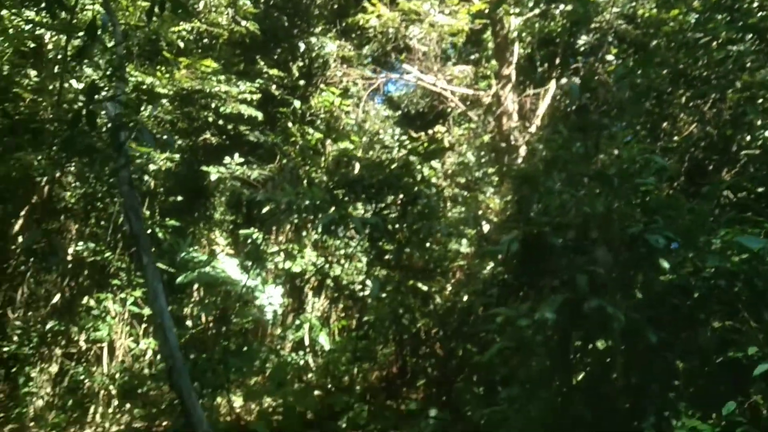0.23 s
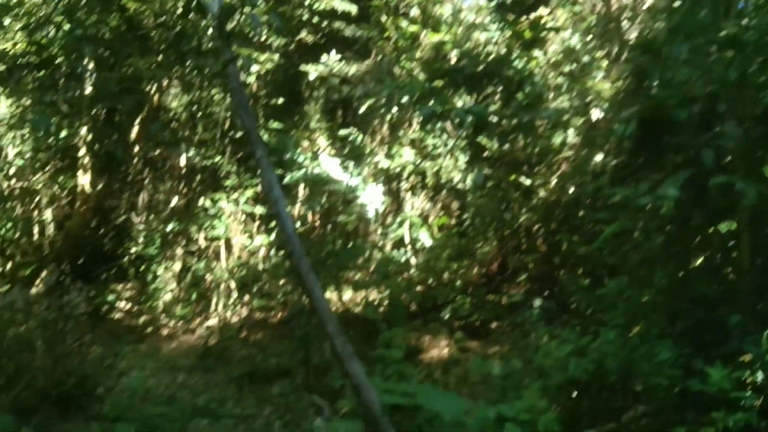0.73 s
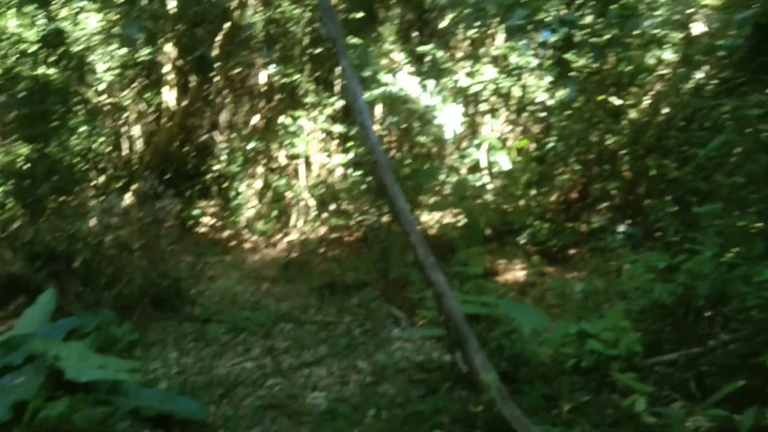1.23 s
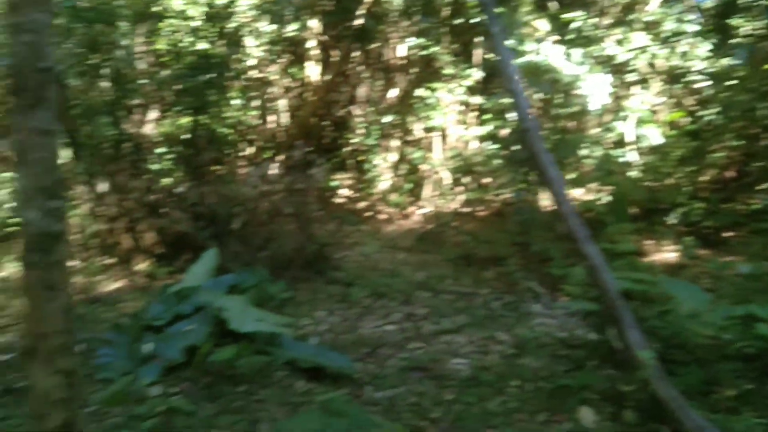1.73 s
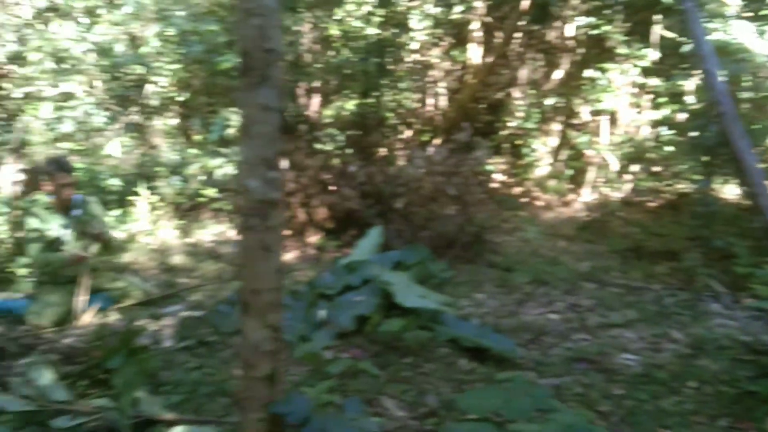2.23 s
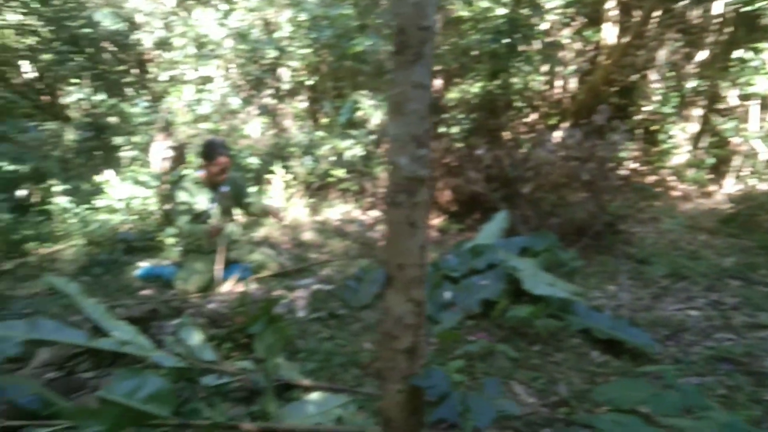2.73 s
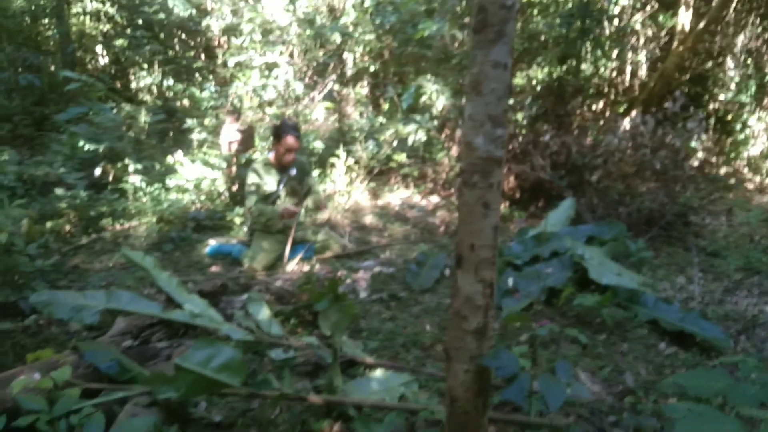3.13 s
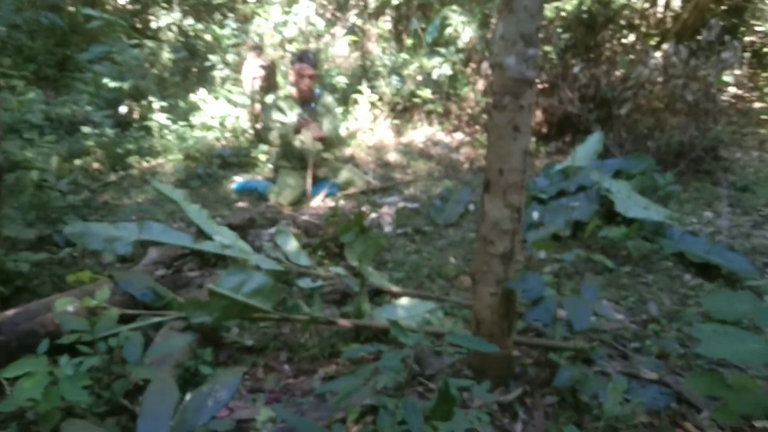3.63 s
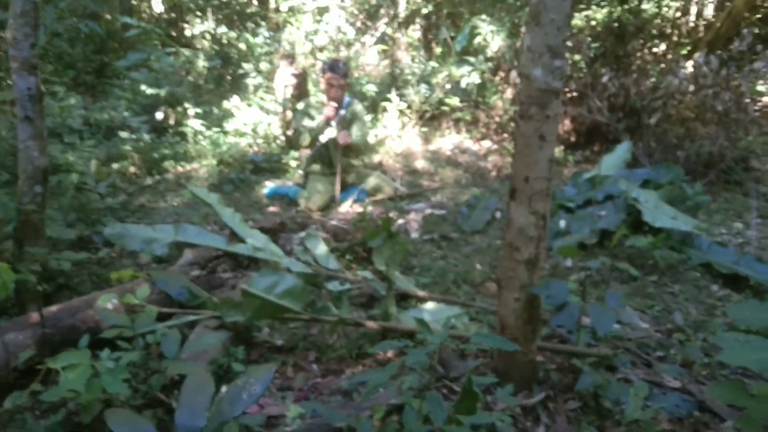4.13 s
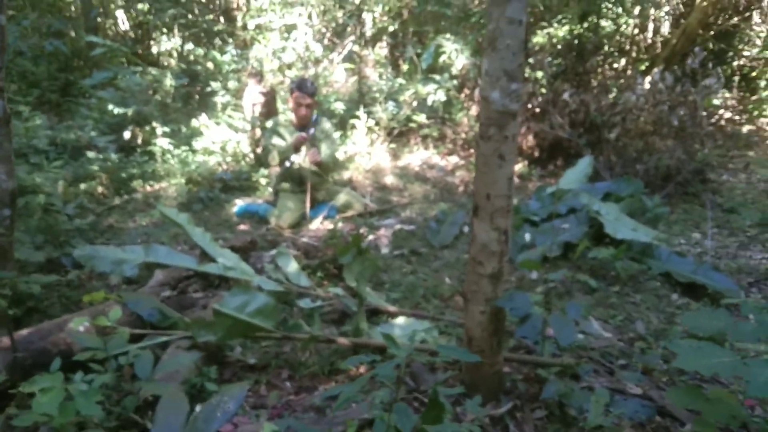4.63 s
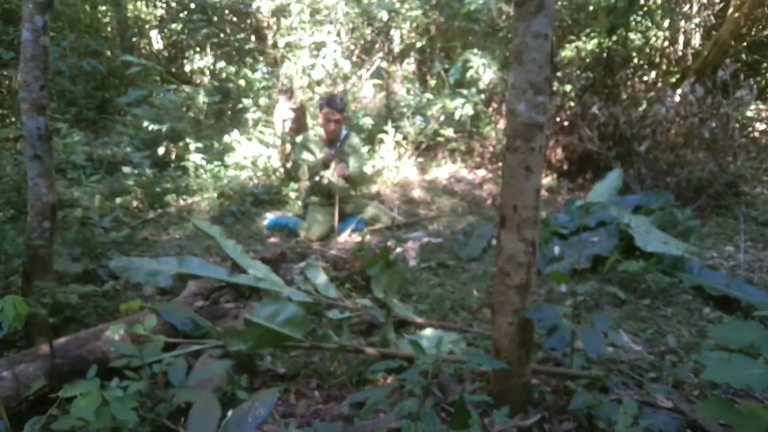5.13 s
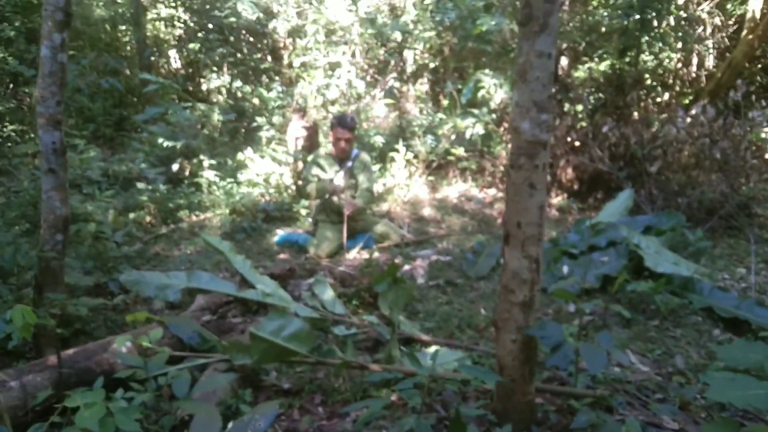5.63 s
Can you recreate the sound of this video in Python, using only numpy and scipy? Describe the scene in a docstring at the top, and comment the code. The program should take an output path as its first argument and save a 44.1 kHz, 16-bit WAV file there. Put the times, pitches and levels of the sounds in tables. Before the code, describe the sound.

Someone treads carefully over dead leaves and sticks, twigs cracking close by and echoing lightly among trees, with thin distant insect song.

```python
"""Forest floor: slow steps through dry leaf litter, with soft thuds, stick knocks, shuffling and scuffs. Twigs
snap as noise bursts through wood resonances; a leafy branch swept aside crackles as ringing grains. Clicks
close to the microphone are damped modes; twigs, branch, knocks and clicks echo among the trunks. Thin insect
song, faint whistles and one lingering twig ring are blurred tones in the distance, over steady air noise."""
import sys
import numpy as np
from scipy import signal
from scipy.fft import rfft, irfft, next_fast_len
from scipy.io import wavfile

SR = 44100
rng = np.random.default_rng(int(sys.argv[2]) if len(sys.argv) > 2 else 0)


def unload_audio(sound):
    """Save the sound as a 16-bit wav file, at the path given as the first command line argument."""
    columns = np.transpose(np.atleast_2d(sound))
    # keep every value between -1 and 1, then stretch to whole-number steps
    steps = np.round(np.clip(columns, -1, 1) * 32767)
    wavfile.write(sys.argv[1], SR, steps.astype(np.int16))


N = 259925
TIME = np.arange(N) / SR


def from_db(db):
    """Amplitude ratio of a level in dB."""
    return 10 ** (np.asarray(db) / 20)


def rms_one(x):
    """Scale to rms 1."""
    return x / np.sqrt(np.mean(x ** 2) + 1e-20)


def in_time(rows):
    """Each column of a curve, interpolated sample by sample."""
    s, *columns = np.transpose(rows)
    return [np.interp(TIME, s, c) for c in columns]


def add(track, s, sound):
    """Mix a sound in at a time in s."""
    at = int(s * SR)
    track[at:at + len(sound)] += sound[:max(N - at, 0)]


def lowpass(x, order, cutoff_hz):
    """Butterworth low-pass."""
    return signal.sosfilt(signal.butter(order, cutoff_hz, fs=SR, output="sos"), x)


def coloured(x, spectrum):
    """Causal minimum-phase filter that follows a spectrum (f/Hz, gain/dB), by folding its cepstrum."""
    size = 2 * next_fast_len(len(x) // 2 + 2048)
    hz, db = np.transpose(spectrum)
    bins_hz = np.arange(size // 2 + 1) * SR / size
    gain = from_db(np.interp(np.log(bins_hz + 1), np.log(hz), db))
    cepstrum = irfft(np.log(gain))[:size // 2]
    cepstrum[1:] *= 2
    return irfft(rfft(x, size) * np.exp(rfft(cepstrum, size)))[:len(x)]


def resonance(x, hz, width_hz):
    """Two-pole band-pass with gain 1 at its peak."""
    r = np.exp(-np.pi * width_hz / SR)
    zeros = np.array([1, 0, -1]) * (1 - r * r) / 2
    poles = [1, -2 * r * np.cos(2 * np.pi * hz / SR), r * r]
    return signal.lfilter(zeros, poles, x + 1e-18)


def dying(t, t60):
    """Exponential decay by 60 dB in t60 s."""
    return np.exp(-np.log(1000) * t / t60)


def bump(middle_s, length_s):
    """Gaussian swell; length_s is the full width at 1/e."""
    return np.exp(-(2 * (TIME - middle_s) / length_s) ** 2)


def drift(rate_hz):
    """Random curve: unit-normal knots at rate_hz, joined by straight lines."""
    knots = rng.standard_normal(4096)
    return np.interp(TIME * rate_hz, np.arange(len(knots)), knots)


def grains(per_s, spread_db):
    """Tiny fractures: impulses of uneven size and random sign at random moments."""
    size_db = spread_db * np.minimum(rng.exponential(1, N), 4)
    sizes = from_db(size_db) * rng.choice([-1, 1], N)
    return sizes * (rng.random(N) < per_s / SR)


def blows(rows, modes, ring_cycles, contact_cycles):
    """A cushioned blow (t/s, level/dB, f/Hz) swells over part of a cycle and rings a few damped modes."""
    out, t = np.zeros(N), TIME[:8192]
    for s, db, hz in rows:
        ring = sum(from_db(mode_db) * np.sin(2 * np.pi * hz * ratio * t) for ratio, mode_db in modes)
        swell = 1 - np.exp(-hz * t / contact_cycles)
        add(out, s, from_db(db) * ring * dying(t, ring_cycles / hz) * swell)
    return out


def softened(x, top_hz):
    """Dead leaves between sole and stick take the sharp edge off a blow."""
    return lowpass(x + 1e-18, 4, top_hz)


def footfalls():
    """A foot thuds on the ground and at once knocks the sticks lying on it."""
    # t/s, thud level/dB before gain, thud f/Hz, knock level/dB before gain and softening, knock f/Hz
    steps = [(.175, -60, 139, -38.5, 900), (.199, -63, 140, -43.5, 640), (.254, -45, 129, -42.5, 533),
             (0.2922, -37.5, 137, -38.5, 520), (.367, -45.5, 107, -55, 450), (.956, -48, 148, -43, 566),
             (1.4618, -46, 94, -22.5, 539), (1.504, -56, 100, -36, 625), (1.792, -50, 99.6, -64, 450),
             (2.178, -48, 115, -59, 394), (2.315, -45, 107, -67, 353), (2.463, -43.5, 109, -52.5, 448),
             (2.661, -52.5, 120, -51, 453), (2.8165, -45.5, 134, -43.5, 520), (3.116, -45.5, 102, -60, 450),
             (3.2279, -42, 136, -37.5, 575), (3.473, -40.5, 142, -40.5, 464), (3.661, -35, 76.4, -59, 505),
             (4.1603, -26.5, 77, -45, 562), (4.3141, -59, 148.4, -26.5, 640), (4.638, -54, 151, -29.5, 380),
             (4.647, -32, 161, -30, 352), (5.0119, -51, 185, -30.5, 790), (5.6494, -60, 110, -16.5, 766),
             (5.672, -40, 97.5, -51, 655)]
    # modes of the ground: f ratio to main pitch, level/dB
    ground_modes = [(1.0, 1.5), (1.7, -10), (2.6, -15.5)]
    # modes of a stick: f ratio to main pitch, level/dB
    stick_modes = [(0.421, -14), (1.0, 0), (1.3, -9.5)]
    thud_gain_db, knock_gain_db = 3.0, 2.5
    thud_cycles, knock_cycles = 4.05, 6.07   # main-pitch cycles to -60 dB
    s, thud_db, thud_hz, knock_db, knock_hz = np.transpose(steps)
    thuds = blows(zip(s, thud_db, thud_hz), ground_modes, thud_cycles, contact_cycles=0.13)
    knocks = blows(zip(s, knock_db, knock_hz), stick_modes, knock_cycles, contact_cycles=0.37)
    return from_db(thud_gain_db) * thuds, from_db(knock_gain_db) * softened(knocks, top_hz=1170)


def leaves(per_s, spread_db, clump_db, ring_share=1.86, width_hz=450, count=10):
    """Dry leaves crackle in clumps; each fracture rings one of count leaf pitches; rms 1."""
    # leaf crackle spectrum: f/Hz, gain/dB
    leaf_colour = [(300, -24), (1000, -12.5), (2100, -4), (2650, -1), (3550, -3), (4400, -4.5),
                   (5400, -6.5), (6100, -6), (6800, -10.5), (8500, -25), (12500, -38), (15300, -34)]
    crackle = grains(per_s, spread_db) * from_db(clump_db * drift(160))
    leaf = rng.integers(0, count, N)
    pitches_hz = np.linspace(1800, 7000, count)
    rings = sum(resonance(crackle * (leaf == k), hz, width_hz) for k, hz in enumerate(pitches_hz))
    return rms_one(coloured(crackle + ring_share * rings, leaf_colour))


def rustle(spectrum, lumpy_db, lumps_per_s):
    """Friction as noise of uneven level; rms 1."""
    noise = rng.standard_normal(N) * from_db(lumpy_db * drift(lumps_per_s))
    return rms_one(coloured(noise, spectrum))


def scuffing():
    """Strength of a sole's short slides over the leaves: quick rise, exponential fall."""
    # slides: t/s, level/dB before the rise, fall to 1/e/s
    scuffs = [(.176, -63, 0.043), (2.178, -59.5, 0.019), (2.814, -65, .025), (3.005, -64.5, 0.13),
              (3.69, -52.5, 0.027), (4.123, -58, 0.081), (4.983, -57, 0.12), (5.557, -59.5, 0.025),
              (5.826, -54, 0.014), (5.865, -51, 0.012)]
    rise_share = 0.1   # rise time / fall time
    out, t = np.zeros(N), TIME[:SR // 2]
    for s, db, fall_s in scuffs:
        rise = 1 - np.exp(-t / (rise_share * fall_s))
        add(out, s, from_db(db) * rise * np.exp(-t / fall_s))
    return out


def shuffling():
    """The walker's effort drives low rumble, soft rubbing and litter crackle together."""
    # how briskly the walker moves: t/s, level above an easy pace/dB
    effort = [(0, -4.5), (.14, -8), (.3, 3.5), (.58, -4.5), (.72, 0), (1.0, -1.5), (1.36, -10), (1.53, 8),
              (1.85, -6.5), (2.35, -1), (2.95, -4.5), (3.15, 0), (4.05, -5), (4.28, 2.5), (4.64, -1),
              (4.85, -6.5), (5.5, 0.5), (5.8, 7)]
    # rumble swells as the weight shifts: middle t/s, 1/e full width/s, peak level/dB
    weight_shifts = [(0.252, 0.2, -61), (0.736, .1, -65), (3.1, 0.18, -65), (4.28, .08, -58.5),
                     (4.57, 0.25, -61.5)]
    # friction spectrum: f/Hz, gain/dB
    rubbing_colour = [(100, -10.5), (250, -4.5), (600, -0.5), (1100, -3), (2500, -6), (6000, -42),
                      (12000, -37.5)]
    # low rumble spectrum: f/Hz, gain/dB
    rumble_colour = [(20, -39.5), (40, -13), (65, -2.5), (90, 1.5), (150, -6.5), (260, -9.5), (600, -25),
                     (2000, -46)]
    # level at an easy pace in dB, dB gained per dB of effort
    rumble_db, rumble_follows = -67.5, 0.67
    rubbing_db, rubbing_follows = -70.5, 0.95
    crackle_db, crackle_follows = -67.5, 1.5
    scuff_rubbing_db = -6   # rubbing in a scuff, re its crackle
    effort_db, scuffs = in_time(effort)[0], scuffing()
    shifts = sum(from_db(db) * bump(s, length_s) for s, length_s, db in weight_shifts)
    crackle = from_db(crackle_db + crackle_follows * effort_db) + scuffs
    rubbing = from_db(rubbing_db + rubbing_follows * effort_db) + from_db(scuff_rubbing_db) * scuffs
    rumble = from_db(rumble_db + rumble_follows * effort_db) + shifts
    return (crackle * leaves(per_s=3400, spread_db=2.0, clump_db=2.5, ring_share=1.0)
            + rubbing * rustle(rubbing_colour, lumpy_db=4.0, lumps_per_s=83)
            + rumble * rustle(rumble_colour, lumpy_db=2.0, lumps_per_s=40))


def fracture(x, low_hz, high_hz, ring_db, top_hz, ring_width_hz=480):
    """Colour of one twig: a broad crack, two wood rings and a soft top."""
    # twig spectrum: f/Hz, gain/dB
    twig_colour = [(150, -12), (600, -6.5), (1200, -8.5), (2200, -1.5), (3400, -2.5), (5500, -3),
                   (7000, -9.5), (9000, -19.5), (12500, -35), (15300, -26)]
    rings = resonance(x, low_hz, ring_width_hz) + resonance(x, high_hz, ring_width_hz)
    cracked = lowpass(x + from_db(ring_db) * rings, 2, min(top_hz, .45 * SR))
    return coloured(cracked, twig_colour)


def twigs(spread_db=2.0, first_break=1.1):
    """A twig fails in one break and a quick run of smaller ones; returns direct sound and echo send."""
    # breaks: t/s, rms level over first 5 ms/dB, splintering fall to 1/e/s, lower ring f/Hz,
    # upper ring f/Hz, echo send re direct/dB
    snaps = [(.303, -31.5, .0045, 3000, 3750, -12), (.320, -38, 0.0012, 4950, 5500, -13),
             (.6003, -28.5, .0022, 3720, 4650, -9), (.6675, -27.5, 0.0023, 3460, 4240, -10),
             (.9955, -47.5, 0.0032, 3700, 4700, -9), (1.391, -43, .003, 3670, 5470, 1),
             (1.422, -36, 0.0022, 3420, 3560, 1.5), (1.4328, -25.5, 0.0038, 3780, 5200, -12),
             (1.4495, -30.5, 0.0017, 3700, 5240, -21), (1.458, -32, 0.0037, 3830, 4350, -25),
             (1.4938, -34.5, .002, 2020, 3280, -11), (3.2265, -32, 0.00034, 3050, 6300, -24.5),
             (3.656, -41.5, 0.0051, 1600, 3830, -10), (4.160, -33.5, 0.0046, 4800, 6170, -20),
             (4.3145, -47.5, 0.0067, 3960, 6900, -13), (4.6376, -25, .0008, 1300, 4200, -33),
             (4.6474, -27.5, 0.0013, 1850, 3400, -43), (5.0115, -46, 0.0036, 3300, 4750, -7),
             (5.647, -39.5, .004, 2300, 3680, -16), (5.6555, -35.5, 0.0023, 2330, 3660, -14),
             (5.660, -34.5, 0.0029, 3580, 3820, 0), (5.671, -41.5, 0.0075, 2200, 3600, -3)]
    # a clean break rings, a long splintering one does not
    ring_ref_db, ring_ref_splinter_s, ring_loss_db_per_doubling = 10.5, 0.0033, 5.5
    top_per_ring = 3.5   # crack top / upper ring f
    rise_share = 0.38    # rise time / splintering time
    direct, sent, t = np.zeros(N), np.zeros(N), TIME[:4096]
    fibres, impulse = grains(24000, spread_db), 1. * (t == 0)
    for k, (s, db, splinter_s, low_hz, high_hz, echo_db) in enumerate(snaps):
        doublings = np.log2(splinter_s / ring_ref_splinter_s)
        ring_db = ring_ref_db - ring_loss_db_per_doubling * doublings
        top_hz = top_per_ring * high_hz
        envelope = np.exp(-t / splinter_s) * (1 - np.exp(-t / (rise_share * splinter_s)))
        burst = fibres[k * len(t):(k + 1) * len(t)] * envelope
        crack = fracture(burst + first_break * impulse, low_hz, high_hz, ring_db, top_hz)
        crack *= from_db(db) / np.sqrt(np.mean(crack[t < .005] ** 2) + 1e-20)
        add(direct, s, crack)
        # scattering smears the single breaks: only the twig's colour and energy reach the echo
        colour = rms_one(fracture(impulse, low_hz, high_hz, ring_db, top_hz))
        add(sent, s, colour * crack.std() * from_db(echo_db))
    return direct, sent


def branch():
    """Leaves of a bending branch crackle ever louder, then settle quickly once it is let go."""
    # its leaves are brighter than the litter: f/Hz, gain/dB
    tint = [(1000, -1.5), (2000, -4.5), (2700, -6), (3600, 2), (6000, 1), (10000, 2)]
    start_s, release_s = 1.359, 1.455
    peak_db, grows_db_per_s, dies_db_per_s = -36, 75, 380
    late_s = TIME - release_s
    level_db = peak_db + np.minimum(grows_db_per_s * late_s, -dies_db_per_s * late_s)
    crackle = leaves(per_s=1800, spread_db=2.0, clump_db=0.0, ring_share=2.5)
    return (TIME > start_s) * from_db(level_db) * rms_one(coloured(crackle, tint))


def clicks():
    """One hard contact close by rings a few heavily damped modes of alternating sign."""
    # contacts: t/s, level/dB added to each mode's, pitch ratio to the modes
    contacts = [(.6005, -24, 1.08), (1.433, -21, 1.5), (1.4628, -13.5, 1.19), (1.506, -23.5, 0.7),
                (3.215, -27.5, 0.99), (3.474, -36.5, 0.72), (3.715, -43, 1.3), (4.128, -35.5, 0.64),
                (4.266, -38, 1.25), (4.6374, -2, 1.0), (4.6466, -11.5, 1.0), (4.679, -34, 0.77)]
    # modes: f/Hz at ratio 1, level/dB, t60/s
    modes = [(784, -23.5, 0.012), (1600, -9, 0.0031), (1940, -12.5, 0.0014), (2950, -3.5, 0.004),
             (4070, -6.5, 0.00076), (6130, -14, 0.0066)]
    out, t = np.zeros(N), TIME[:2048]
    for s, db, pitch in contacts:
        for k, (hz, mode_db, t60) in enumerate(modes):
            ring = np.sin(2 * np.pi * hz * pitch * t) * dying(t, t60)
            add(out, s, (-1) ** k * from_db(db + mode_db) * ring)
    return out


def forest(x, near_t60=0.26, far_t60=0.76, far_db=-15, build_s=0.002):
    """Near trunks scatter a quick tail, far ones a faint long one; the echo is thin and bright."""
    t = TIME[:SR]
    fade = (dying(t, near_t60) + from_db(far_db) * dying(t, far_t60)) * (1 - np.exp(-t / build_s))
    tail = rng.standard_normal(SR) * fade
    echo = signal.fftconvolve(x, tail / np.sqrt(np.sum(tail ** 2)))[:N]
    # f/Hz, gain/dB
    return coloured(echo, [(200, -20), (1200, 6.0), (3200, 1.5), (7000, 7.0), (15000, 10.0)])


def narrow_band(hz, width_hz):
    """A tone blurred by many voices and echoes, as modulated slow noise; pitch may glide; rms 1."""
    blur = lowpass(rng.standard_normal((2, N)), 2, width_hz / 2)
    phase = 2 * np.pi * np.cumsum(hz) / SR
    return rms_one(blur[0] * np.cos(phase) + blur[1] * np.sin(phase))


def insects(width_hz=420, skirt_hz=900, skirt_db=-6):
    """Many far insects merge into one narrow, slowly gliding band with soft skirts."""
    # chorus: t/s, level/dB, f/Hz
    chorus = [(0, -71, 6260), (.25, -84, 6410), (1.9, -77, 6130), (2.3, -69.5, 6120), (3.1, -71.5, 6340),
              (4.0, -76, 6130), (5.3, -70, 6110), (5.89, -87, 6250)]
    level_db, hz = in_time(chorus)
    band = narrow_band(hz, width_hz) + from_db(skirt_db) * narrow_band(hz, skirt_hz)
    return rms_one(band) * from_db(level_db)


def far_tones(width_hz=240, waver_db=2.0):
    """Far calls, and one twig ring lingering among the trees, swell and fade, wavering in level, blurred by the
    forest."""
    # tones (far calls and, at 1.03 s, a lingering twig ring): middle t/s, peak level/dB before waver, f/Hz
    tones = [(.07, -76, 4230), (.43, -70, 4300), (1.03, -67, 3750), (2.1, -73.5, 4300), (3.02, -74, 4200),
             (3.35, -74.5, 4250), (3.53, -74, 4370), (3.8, -73.5, 4330), (5.33, -74.5, 4300)]
    length_s = .17
    middles, _, pitches = np.transpose(tones)
    swell = sum(from_db(db) * bump(s, length_s) for s, db, hz in tones)
    # pitch steps halfway between tones
    pitch = pitches[np.searchsorted((middles[1:] + middles[:-1]) / 2, TIME)]
    return narrow_band(pitch, width_hz) * swell * from_db(waver_db * drift(25))


def air(level_db=-71.5):
    """Steady background air as coloured noise."""
    # air spectrum: f/Hz, gain/dB
    air_colour = [(30, -17), (90, -5.5), (400, 3.5), (1000, -3.5), (4000, -3), (7000, -15.5), (9000, -14.5),
                  (12500, -19.5), (15300, -17)]
    return from_db(level_db) * rms_one(coloured(rng.standard_normal(N), air_colour))


def scene():
    """Mix the direct sounds with their forest echo."""
    snaps, snaps_sent = twigs()
    thuds, knocks = footfalls()
    sweep, close = branch(), clicks()
    background = air()
    # the nearer a sound is to the microphone, the less echo comes with it
    sent = snaps_sent + from_db(-11.5) * sweep + from_db(-13.0) * knocks + from_db(-35.0) * close
    echo = forest(sent)
    steps = knocks + thuds + shuffling()
    return (steps + snaps + sweep + close + insects() + far_tones() + background + echo)[None]


def record(dry):
    """The small microphone colours the sound and loses the deep bass; the top is cut steeply."""
    # microphone response: f/Hz, gain/dB
    response = [(70, 0.5), (250, 3), (620, 2.5), (950, 2), (1200, 1), (1700, 1.5), (2450, -1), (3200, 0.5),
                (6000, -0.5), (15000, -0.5)]
    bass_cut_hz, top_cut_hz = 58, 15700
    bass_cut = signal.butter(4, bass_cut_hz, "high", fs=SR, output="sos")
    top_cut = signal.ellip(10, .2, 70, top_cut_hz, fs=SR, output="sos")
    thin = signal.sosfilt(bass_cut, coloured(dry[0], response))
    return signal.sosfilt(top_cut, thin)[None]


dry = scene()
out = record(dry)
unload_audio(out)
```